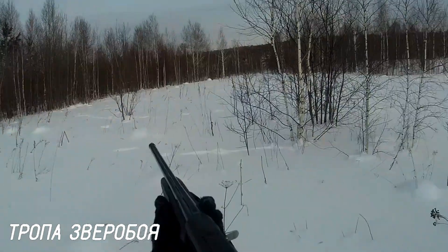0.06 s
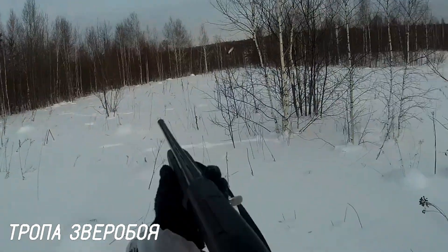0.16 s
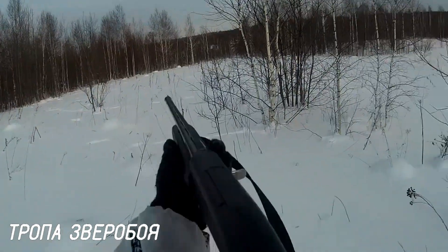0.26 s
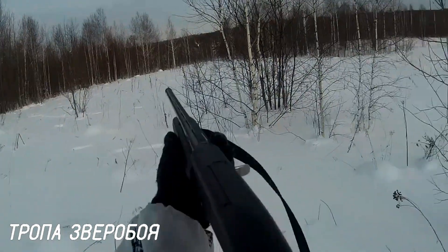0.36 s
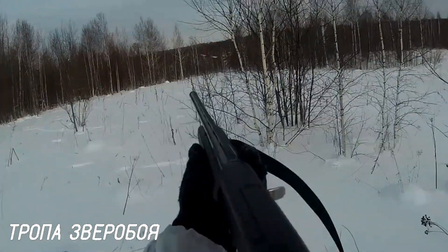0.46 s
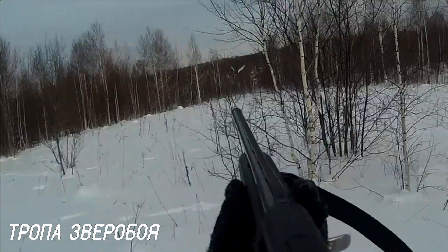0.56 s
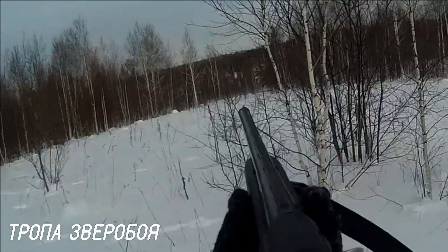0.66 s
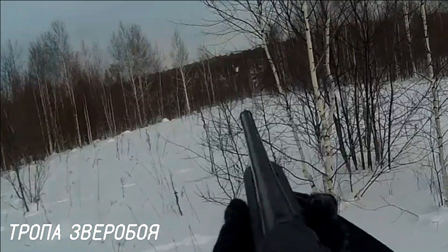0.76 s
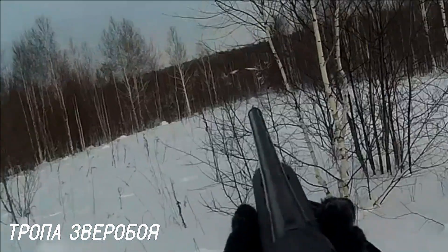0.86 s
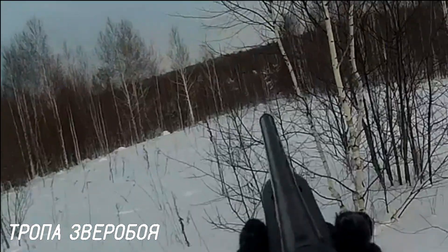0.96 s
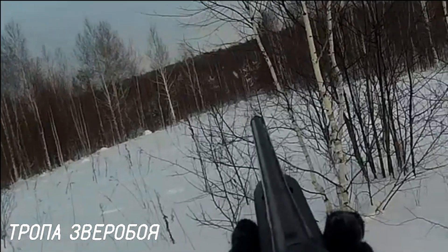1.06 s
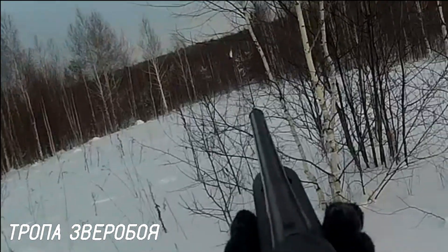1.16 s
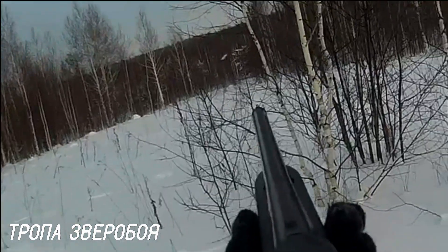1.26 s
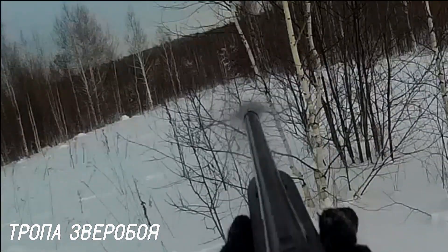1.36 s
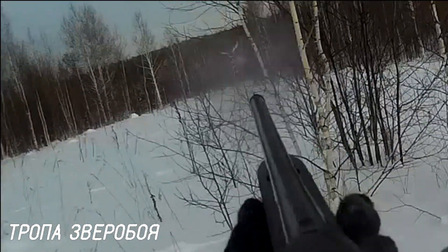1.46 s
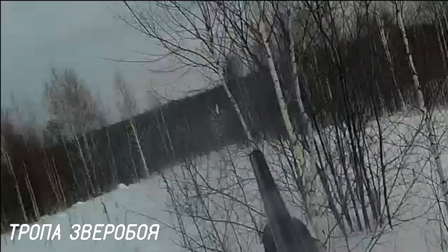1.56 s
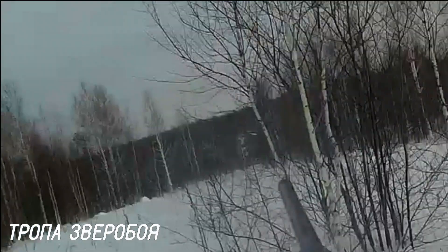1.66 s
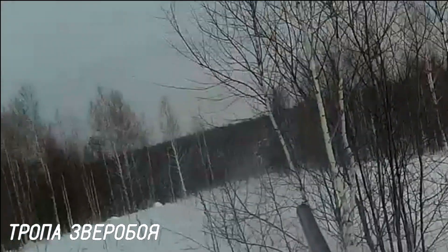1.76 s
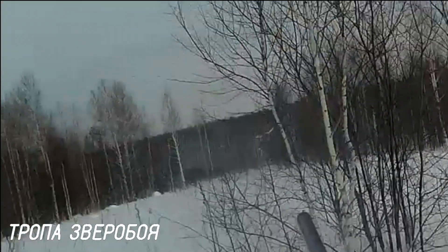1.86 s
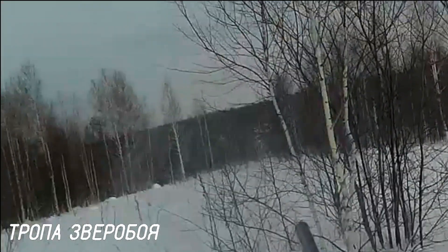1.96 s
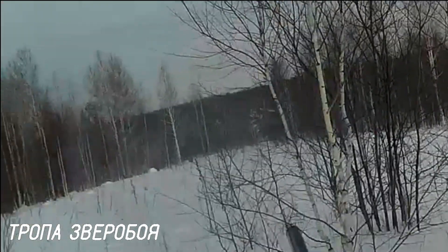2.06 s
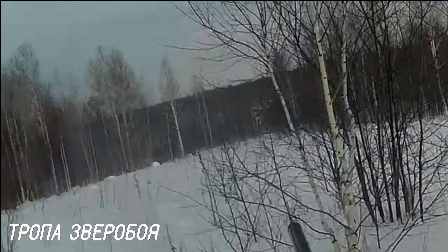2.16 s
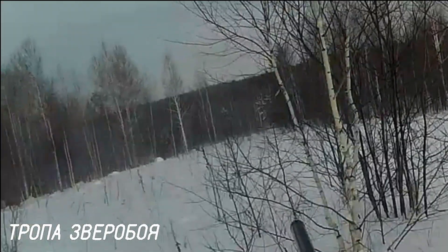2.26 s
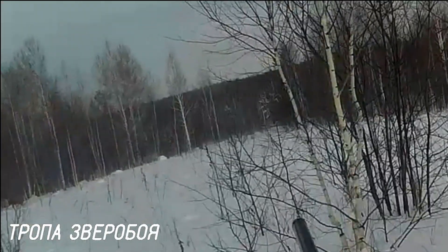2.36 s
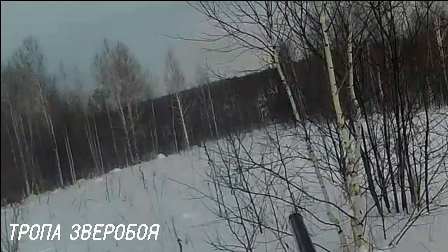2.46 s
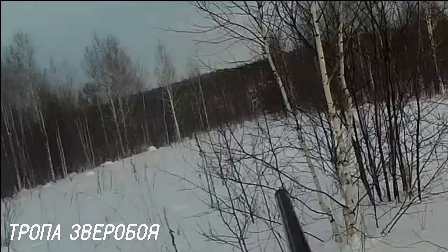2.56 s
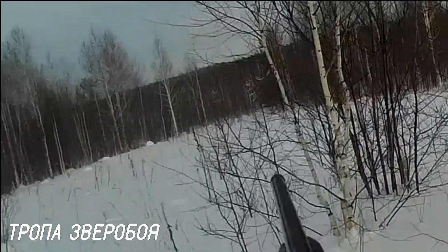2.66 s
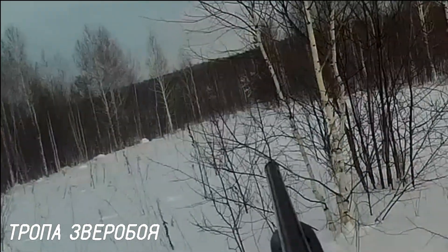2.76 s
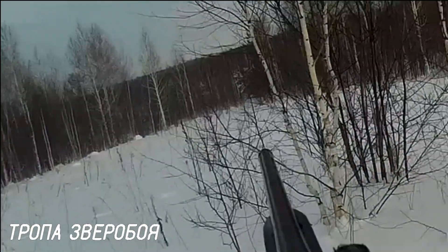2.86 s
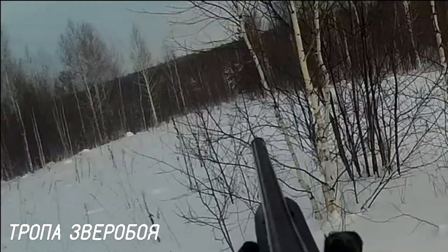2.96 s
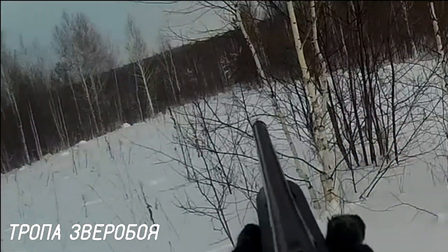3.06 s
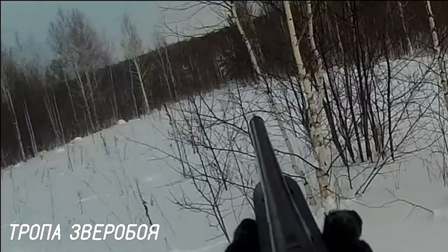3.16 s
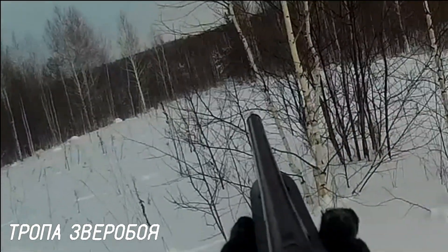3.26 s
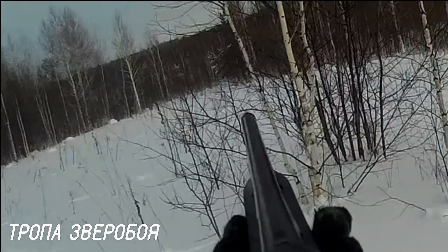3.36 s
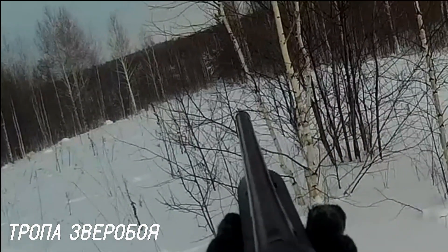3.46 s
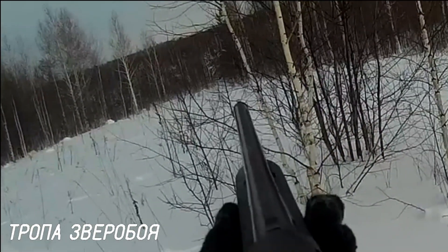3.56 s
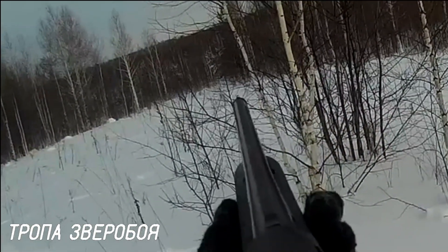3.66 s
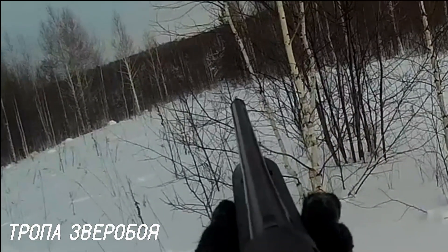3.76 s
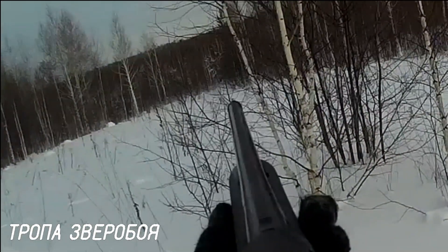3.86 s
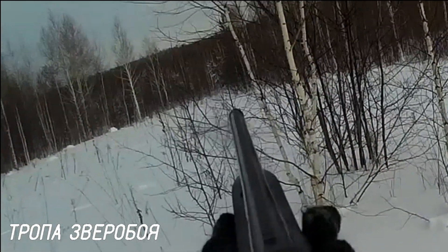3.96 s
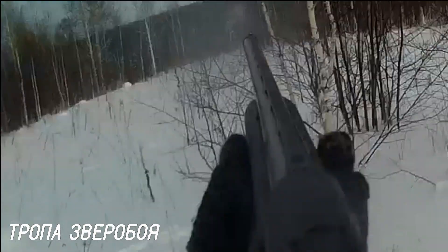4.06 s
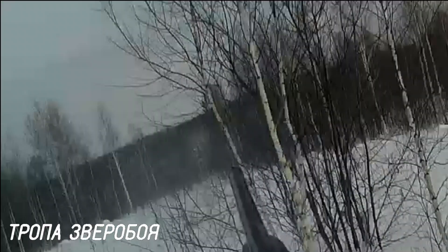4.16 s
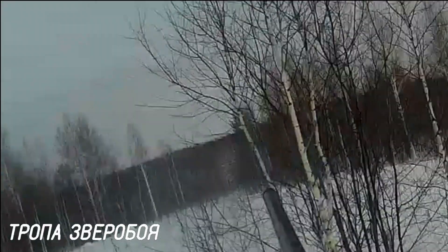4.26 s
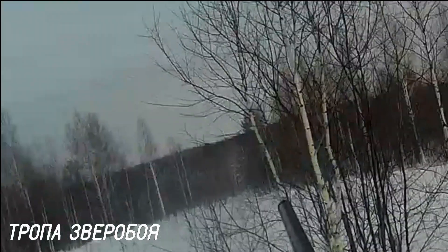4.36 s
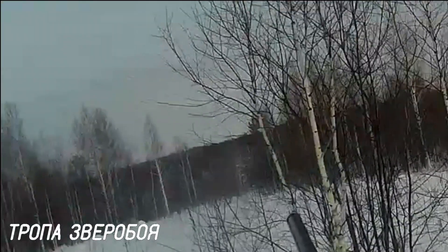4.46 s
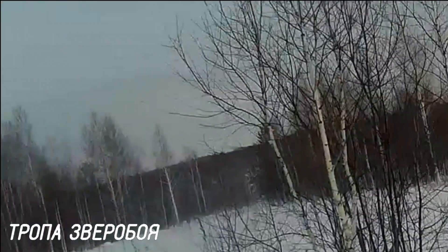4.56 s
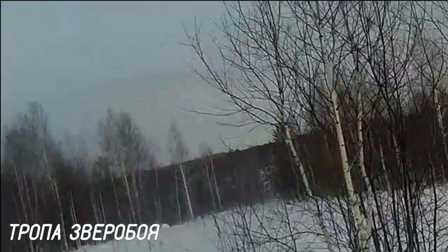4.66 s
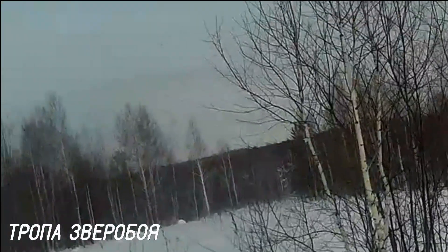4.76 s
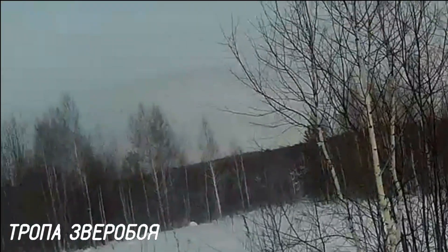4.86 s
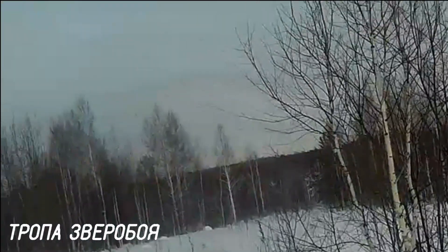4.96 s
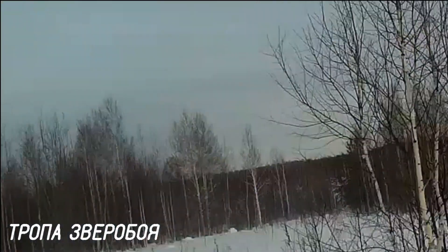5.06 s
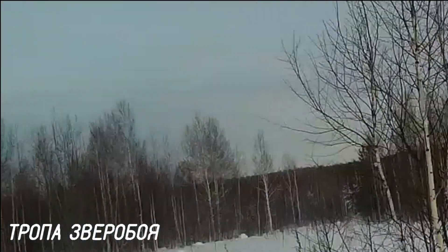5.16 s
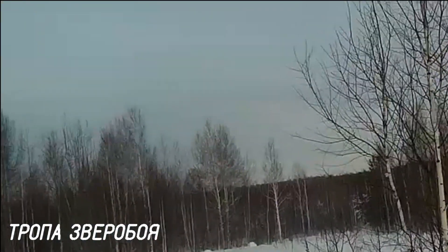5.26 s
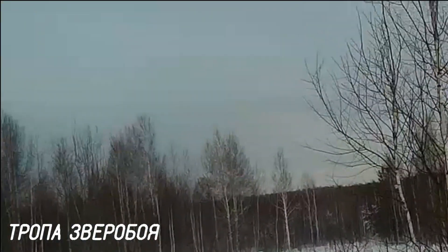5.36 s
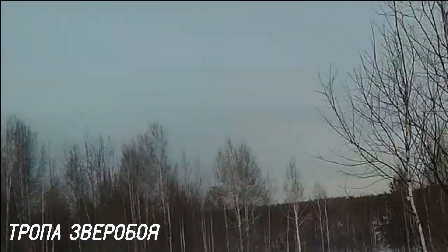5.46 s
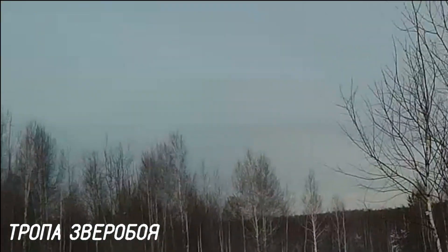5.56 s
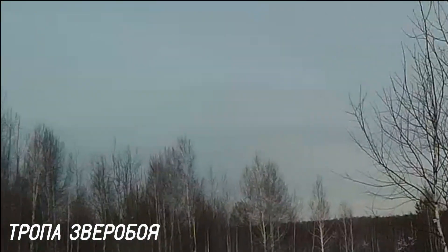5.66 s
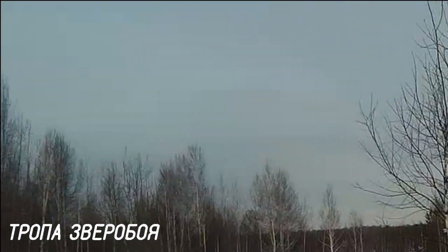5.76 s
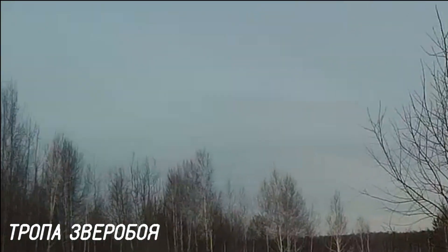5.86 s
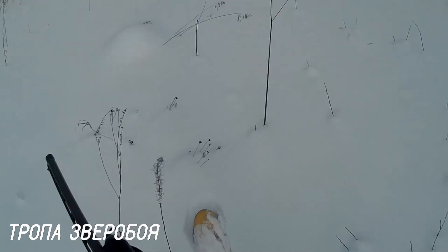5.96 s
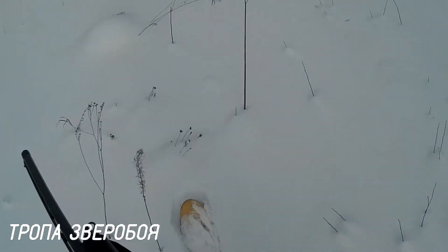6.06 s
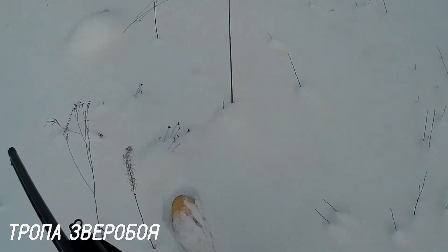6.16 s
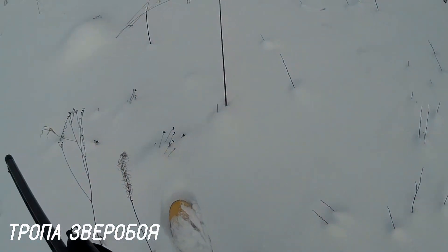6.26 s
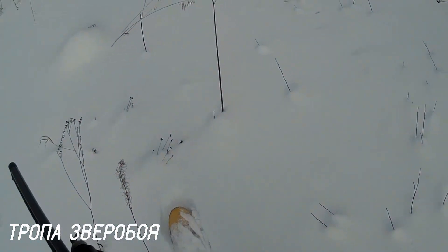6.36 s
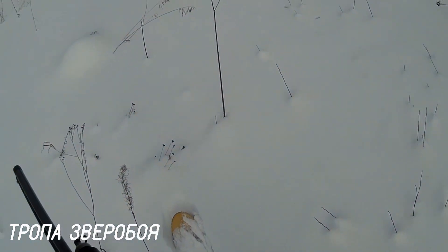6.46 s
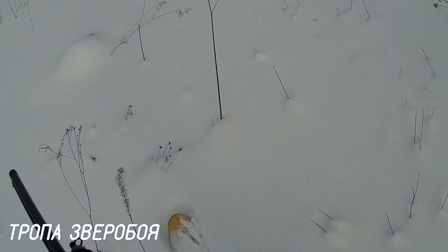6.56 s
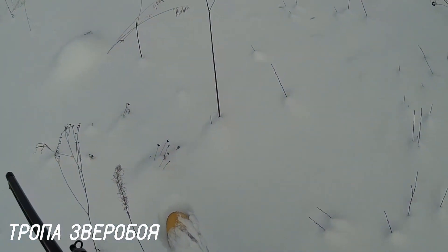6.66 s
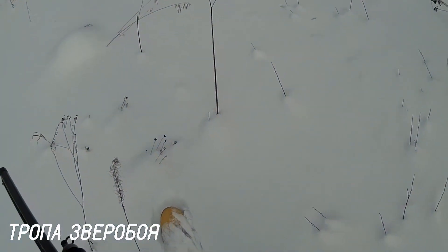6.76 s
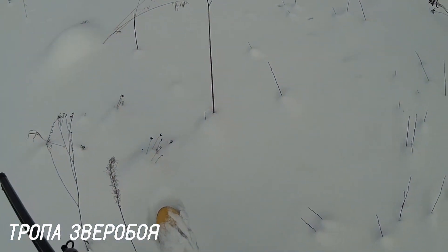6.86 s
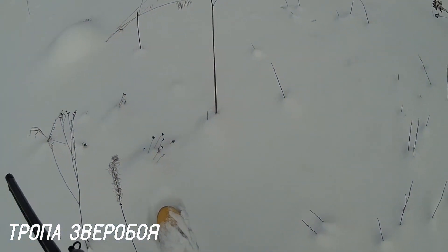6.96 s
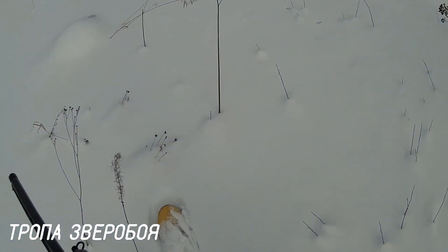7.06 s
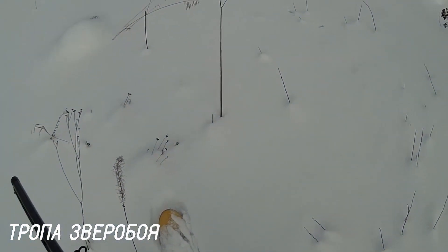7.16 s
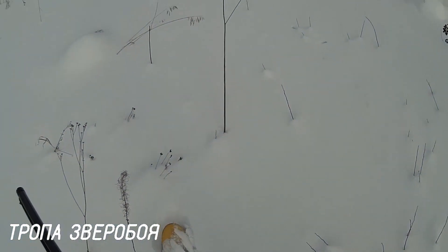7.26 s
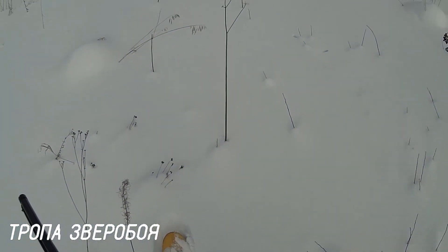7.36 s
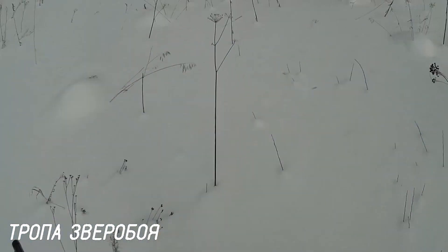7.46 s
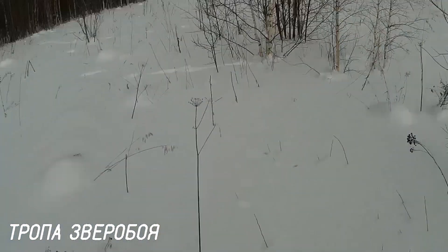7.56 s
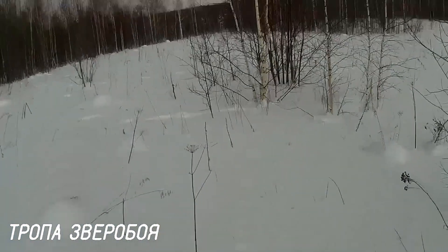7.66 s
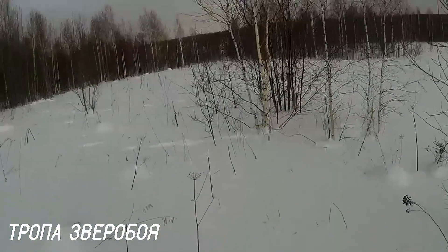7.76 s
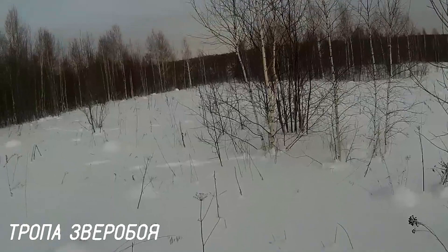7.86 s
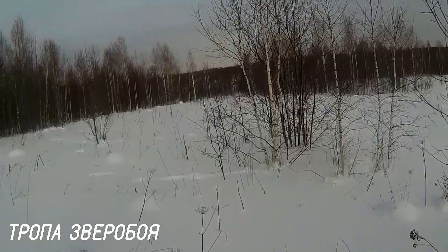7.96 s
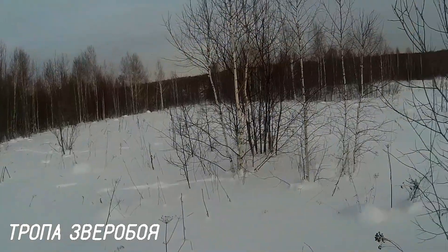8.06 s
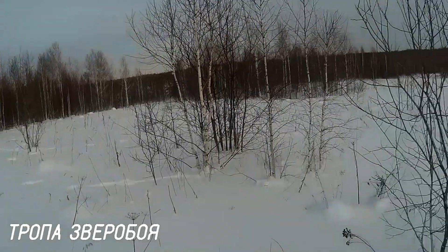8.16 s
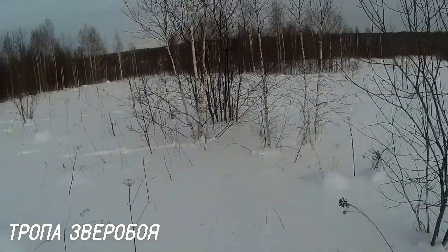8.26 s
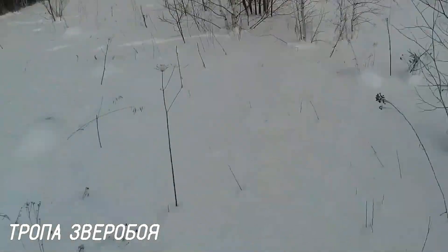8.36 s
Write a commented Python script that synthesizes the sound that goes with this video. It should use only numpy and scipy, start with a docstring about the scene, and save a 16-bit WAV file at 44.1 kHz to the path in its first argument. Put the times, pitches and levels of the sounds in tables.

```python
"""Two shotgun blasts in a snowy forest

Two blasts of a self-loading shotgun overload a camera worn by the shooter. Each is a noisy crack, boom and pressure swing.
After each, the bolt flies back, throws the shell and slams shut: bursts of noise plus ringing steel tones.
The forest gives both shots the same rolling echo, made of many random arrivals. It swells up to the
forest edge and darkens with distance until a cut ends it; the segment after the cut has more treble.
The gun and sling click before, between and after the shots, clothes rustle, and a faint hiss runs throughout."""
import sys
import numpy as np
from scipy.fft import rfft, irfft, next_fast_len
from scipy.io import wavfile
from scipy.ndimage import map_coordinates

SR = 44100
rng = np.random.default_rng(int(sys.argv[2]) if len(sys.argv) > 2 else 0)


def digitize_waveform(pressure):
    """Quantize a signal to 16-bit integers and store it at the path in sys.argv[1].

    Rows of a 2-D input are taken as channels; values are limited to [-1, 1].
    """
    field = np.atleast_2d(pressure).T
    bounded = np.clip(field, -1, 1)
    quanta = np.round(bounded * 32767).astype(np.int16)
    wavfile.write(sys.argv[1], SR, quanta)


N = 370881
TIME = np.arange(N) / SR
BRIEF = TIME[:SR // 3]  # the time within one short sound
CUT_S = 5.981  # a cut ends the echo; the segment after it is brighter
NARROW_HZ, TOP_HZ = 6184, 16000  # upper band limit of the first segment, and of the whole
NEAREST_TREES_S, FOREST_EDGE_S = 0.2, 0.91  # echo delays
TREE_LINE_S = 0.02  # the first trees come in over this much delay
SHADE_S = 0.15  # past the edge, the front trees screen the rest on this time scale

# Spectra give the colour of a noise; their levels are relative.
# effort of the shooter's arms, in two stretches: t/s, effort/dB
ARM_EFFORT = [
    [(0.0, -55.5), (0.118, -55.5), (0.288, -63), (0.52, -60.5), (0.676, -65), (0.814, -60.5),
     (0.988, -70.5), (1.3, -83)],
    [(6.02, -60.5), (6.14, -68), (6.39, -68), (6.49, -61), (6.99, -69.5), (7.51, -60), (8.01, -67.5),
     (8.41, -63)],
]
# sleeves brushing: f/Hz, level/dB
BRUSH_SPECTRUM = [(12, -33.5), (20, 4.5), (92, -5.5), (188, -2), (351, -9), (434, -7), (471, -10),
                  (1000, -19.5), (1300, -50), (2200, -120)]
# sleeves swishing: f/Hz, level/dB
SWISH_SPECTRUM = [(400, -3.5), (800, 1), (1800, 2.5), (3000, -12), (6000, -18)]
# gloves, sleeves and sling scuff the gun: t/s, level/dB, centre f/Hz, length/s
FABRIC_SCUFFS = [(0, -59, 1000, 0.099), (0, -65, 2220, 0.1), (0.141, -61, 790, 0.076),
                 (0.257, -55, 630, 0.042), (0.56, -53, 420, 0.069), (.68, -60, 220, 0.071),
                 (0.565, -66.5, 2300, 0.065), (6.452, -58.5, 1800, 0.034), (6.493, -71, 1600, 0.043),
                 (7.514, -57, 1880, 0.034), (7.746, -58, 643, 0.039), (7.75, -61, 2990, 0.03),
                 (7.869, -61, 1800, 0.061), (7.94, -55, 2400, 0.023), (8.064, -57.5, 1690, 0.026),
                 (8.197, -56, 196, 0.23)]
# steady hiss: f/Hz, level/dB
HISS_SPECTRUM = [(12, -28), (20, 5.5), (182, -5), (337, -16.5), (1480, -18), (1860, -19), (3340, -22),
                 (13500, -25), (16000, -34.5)]
# handling clicks: t/s, relative level/dB, ring f/Hz, tick re ring/dB, stock knock re ring/dB,
# firmness (share of clean ring, 0-1)
HANDLING_CLICKS = [(0.341, -37, 2280, -19, -12, 0.07), (.494, -35.5, 1800, -21, -4, 0.16),
                   (0.562, -40.5, 1900, -22, -8, 0.1), (0.781, -30, 2080, -12, -6, 0.26),
                   (.803, -37, 1110, -24, -23, 0.55), (.998, -39.5, 2310, -14, -6, 0.2),
                   (1.368, -33, 2580, -20, -11, 0.3), (2.6144, -12.5, 1760, -30, -1, 0.34),
                   (2.985, -15, 2160, -32, -3.5, 0.23), (6.0605, -36, 1760, -5, -23, 0.2),
                   (6.127, -37, 1780, -23, -10, 0.4), (6.474, -37, 1600, 1, -22, 0.03),
                   (6.4946, -5.5, 1300, -4.5, -47, 0.63), (6.637, -41.5, 1678, -14, -20, 0.3),
                   (6.709, -50.5, 1260, -14, -14, 0.05), (6.969, -42, 1307, -16, -20.5, 0.3),
                   (7.3995, -40, 1050, 12.5, -20.5, 0.6), (7.472, -47, 890, -17, 0, 0.56),
                   (7.526, -49, 996, -4, 8, 0.44), (7.749, -36, 2340, 0.5, -12, 0.32),
                   (7.788, -42, 1600, -3, -18.5, 0), (7.811, -38, 2990, 1, -16, 0.2),
                   (7.882, -42, 1730, -2, -24, 0), (7.9273, -26, 2290, -5, -29, 0.38),
                   (7.9358, -11, 1290, -3, -12.5, 0.57), (8.069, -41.5, 900, -17, 3.5, 0),
                   (8.0817, -39, 700, 0, -7, 0.37)]
# catch and swivel: f/Hz, average level/dB, t60/s
FITTING_TONES = [(674, -14, 0.051), (2230, -3.5, 0.0054), (3240, -0.5, 0.0088), (4070, 1.5, 0.0081),
                 (6900, -9.5, 0.008), (9046, -14, 0.01)]
# grit in a click: f/Hz, level/dB
TICK_SPECTRUM = [(250, -11), (650, 7), (1300, 12), (2200, 2), (4200, -2.5), (5300, -3), (7500, -5),
                 (9200, -20), (11000, -35), (15000, -42)]
# thud of the stock: f/Hz, level/dB
THUD_SPECTRUM = [(30, -26.5), (80, -18.5), (160, 6.5), (450, 4), (800, 0.5), (1500, -18), (4000, -39)]
# shots: t/s, crack level/dB, crack length/s, relative boom level/dB, relative pressure swing/dB,
# rise/s, echo level/dB
GUNSHOTS = [(1.39, 3, 0.026, 15.5, 1.5, 0.0083, -1.5), (3.975, 13.5, 0.022, 14.5, 5.5, 0.0045, 0)]
# muzzle crack: f/Hz, level/dB
CRACK_SPECTRUM = [(60, -1), (300, 3), (800, 3.5), (2000, -7.5), (5000, -22.5), (8000, -31.5)]
# muzzle boom: f/Hz, level/dB
BOOM_SPECTRUM = [(20, -10), (50, -4), (85, -22), (150, 0.5), (300, -4), (600, -22.5), (2000, -47)]
# echo from snow and bushes near the shooter: f/Hz, level/dB
NEARBY_SPECTRUM = [(35, -2), (110, 1), (200, -3.5), (500, -10), (1300, -11.5), (3200, -15), (6000, -34)]
# low roll from the trunks: f/Hz, level/dB
ROLL_SPECTRUM = [(35, -72), (60, -36), (108, -22.5), (184, -5), (252, -0.5), (359, 1.5), (511, -7.5),
                 (603, 1), (678, -7), (800, -26), (1000, -24), (1300, -57.5), (2200, -120)]
# fine scatter from the twigs: f/Hz, level/dB
SCATTER_SPECTRUM = [(400, -14.5), (750, 11), (1000, 4.5), (1250, 3.5), (1600, 3.5), (2200, -4.5),
                    (3200, -13), (4500, -21.5), (6000, -32), (7500, -53.5)]
# the bolt unlocks, hits its rear stop, rattles, flicks out the shell, picks up the next,
# slams shut and locks: t/s, level/dB, thud re level/dB, t60/s
BOLT_IMPACTS = [(1.43, -18, 1.5, 0.24), (1.4462, -7.5, -3, 0.045), (1.4746, -21.5, 14.5, 0.04),
                (1.4799, -16.5, 14, .022), (1.5027, -24, 9, 0.021), (1.507, -25, 3.5, 0.056),
                (1.551, -27, -4, 0.039), (1.6694, -16, -8, 0.012), (1.6797, -9.5, -3.5, 0.056),
                (1.6923, -12, -1.5, 0.059), (4.016, -21, 1, 0.097), (4.032, -12, -0.5, 0.08),
                (4.0593, -16, 6.5, 0.023), (4.0642, -22.5, 9.5, 0.051), (4.087, -25.5, 6, 0.052),
                (4.092, -27.5, 11, 0.054), (4.0997, -9.5, -4.5, 0.006), (4.268, -20.5, 11.5, 0.0096),
                (4.278, -10, -5, 0.024), (4.2819, -4.5, -18, 0.02), (4.292, -13, -0.5, 0.077)]
# ring of the receiver: f/Hz, average level/dB, longest t60/s
RECEIVER_TONES = [(850, -13.5, .3), (1180, -5.5, 0.45), (1420, -6.5, .16), (1615, -11.5, .25),
                  (1950, -8, .14), (2340, -14, .25), (2520, -13, 0.17), (3000, -11.5, .085),
                  (3340, -12, 0.097), (3540, -14.5, .12), (4840, -26.5, .09), (5700, -29.5, 0.087)]
# steel clashing on steel: f/Hz, level/dB
CLASH_SPECTRUM = [(180, -35), (300, 0), (604, 4), (1010, -8.5), (1320, -3.5), (1680, -3.5), (3300, -12.5),
                  (3930, -22), (4870, -26), (5890, -40), (7500, -62.5), (9750, -100.5), (16500, -120)]
# the recoil spring zings as the bolt reaches its rear stop: t/s, level/dB, centre f/Hz
SPRING_ZINGS = [(1.446, -24.5, 3538), (4.033, -26.5, 3477)]
# echoes from dense stands of trees: delay/s, relative low thump/dB, bright bark reflection/dB
TREE_STANDS = [(0.198, -38, -29.5), (.245, -31.5, -22), (0.288, -28.5, -25.5), (0.361, -22.5, -20.5),
               (0.409, -22, -25), (0.438, -22.5, -23), (.471, -23.5, -38.5), (0.537, -13, -22.5),
               (.596, -17, -22.5), (.643, -14, -24), (0.674, -19.5, -29.5), (.744, -13.5, -22.5),
               (.794, -10.5, -20.5), (.838, -14.5, -32), (.866, -12.5, -29.5), (0.912, -16.5, -28.5),
               (0.939, -21.5, -24), (1.052, -26.5, -32), (1.093, -26.5, -36), (1.138, -23.5, -37),
               (1.183, -21.5, -29), (1.223, -34.5, -32), (1.274, -29.5, -35), (1.348, -42, -30),
               (1.469, -24, -39), (1.495, -26.5, -39), (1.568, -28, -37.5), (1.615, -28, -34),
               (1.715, -25.5, -43), (1.771, -23, -41.5), (1.796, -28, -43), (1.841, -22, -50),
               (1.945, -31.5, -49.5), (2.099, -30, -60), (2.146, -28, -52), (2.195, -30, -42.5)]
# a stand's low thump: f/Hz, level/dB
THUMP_SPECTRUM = [(60, -35), (110, -27.5), (160, -3), (210, 9), (330, 5), (420, -0.5), (510, -13.5),
                  (800, -24.5), (1600, -31), (4000, -70.5)]
# a stand's bright bark reflection: f/Hz, level/dB
BARK_SPECTRUM = [(250, -28.5), (400, 7), (510, -0.5), (610, 5.5), (680, -9.5), (780, -1), (1000, -12.5),
                 (1700, -14), (3000, -26.5), (6000, -49)]
# the bolt rings on after slamming shut: t/s, level/dB
BOLT_SLAMS = [(1.693, -41.5), (4.283, -37)]
# tones of the closed bolt: f/Hz, level/dB
CHIME_TONES = [(4210, -7), (4950, -1), (5810, -10.5)]


def amp(db):
    """Turn decibels into a gain."""
    return 10 ** (np.asarray(db) / 20)


def unit(x):
    """Scale to an average strength (rms) of 1."""
    return x / np.sqrt(np.mean(x ** 2) + 1e-20)


def fade(t60):
    """A decay that loses 60 dB in t60 seconds."""
    return amp(-60 * BRIEF / t60)


def filtered(x, response):
    """Multiply each frequency of x by response(frequency)."""
    size = next_fast_len(len(x) + SR // 2)
    hz = np.fft.rfftfreq(size, 1 / SR)
    return irfft(rfft(x, size) * response(hz), size)[:len(x)]


def coloured(x, spectrum):
    """Shape x by (Hz, dB) points, at rms 1."""
    f, db = np.transpose(spectrum)
    return unit(filtered(x, lambda hz: amp(np.interp(np.log(hz + 1), np.log(f), db))))


def noise(spectrum, size=len(BRIEF)):
    """Coloured noise of rms 1."""
    return coloured(rng.standard_normal(size), spectrum)


def resonant(pitch_hz, width):
    """Noise of rms 1 around one resonance of the given relative width."""
    white = rng.standard_normal(len(BRIEF))
    return unit(filtered(white, lambda hz: 1 / (1 + ((hz - pitch_hz) / (width * pitch_hz)) ** 2)))


def add(track, s, sound):
    """Mix a sound in at time s."""
    start = round(s * SR)
    track[start:start + len(sound)] += sound[:N - start]


def effort():
    """How hard the arms move, as one gain per sample."""
    s, db = np.transpose(np.vstack(ARM_EFFORT))
    return amp(np.interp(TIME, s, db))


def clothes(brush_db=0, swish_db=-64, swish_grows=3.4, grain_db=3.5):
    """Moving sleeves brush, and swish when the effort is high; fabric adds short, grainy scuffs."""
    moving = effort()
    swish = (moving / moving.max()) ** swish_grows
    out = amp(brush_db) * moving * noise(BRUSH_SPECTRUM, N)
    out += amp(swish_db) * swish * noise(SWISH_SPECTRUM, N)
    for s, db, centre_hz, length in FABRIC_SCUFFS:
        stroke = np.sin(np.pi * np.minimum(BRIEF / length, 1))
        wobble = map_coordinates(rng.standard_normal(200), [BRIEF * 250])
        grain = unit(amp(grain_db * wobble))  # fabric catches and slips
        add(out, s, amp(db) * stroke * grain * resonant(centre_hz, width=0.39))
    return out


def hiss(level_db=-66.0):
    """A faint, steady coloured noise."""
    return amp(level_db) * noise(HISS_SPECTRUM, N)


def handling(click_db=-5, tone_db=4, fittings_db=-7, grit_db=-9, after_db=-35, after_t60=0.11,
             ring_cycles=45, overtone=1.5, overtone_db=-13, contact=0.0002):
    """Light touches click drily, firm ones ring the part; the stock knocks, the fittings tick."""
    out = np.zeros(N)
    for s, db, pitch_hz, tick_db, knock_db, firm in HANDLING_CLICKS:
        # low parts ring longer, a firm press damps them
        t60 = ring_cycles * max(1 - firm, .1) / pitch_hz
        phase = 2 * np.pi * pitch_hz * BRIEF
        tone = amp(tone_db) * (np.sin(phase) + amp(overtone_db) * np.sin(overtone * phase))
        body = firm * tone + (1 - firm) * resonant(pitch_hz, width=0.33)
        body += amp(knock_db) * noise(THUD_SPECTRUM)
        ring = body * fade(t60) * (1 - np.exp(-BRIEF / 0.00091))
        steel = np.zeros(len(BRIEF))
        for hz, level, life in FITTING_TONES:
            strength = amp(level + rng.normal(0, 0.99))  # each contact differs a little
            steel += strength * fade(life) * np.sin(2 * np.pi * hz * BRIEF)
        tick = amp(fittings_db) * steel * (1 - np.exp(-BRIEF / contact))
        tick += amp(grit_db) * noise(TICK_SPECTRUM) * fade(t60)
        rattle = amp(after_db) * noise(TICK_SPECTRUM) * fade(after_t60)
        add(out, s, amp(db + click_db) * (ring + amp(tick_db) * tick + rattle))
    return out


def blasts(boom_life=.025, push_life=.04, shudder_hz=178, shudder_db=-2):
    """A bright crack breaks off, a slower boom shakes the camera housing, and pressure swings once."""
    out = np.zeros(N)
    for s, crack_db, crack_life, boom_db, push_db, rise, _ in GUNSHOTS:
        crack = amp(crack_db) * noise(CRACK_SPECTRUM) * np.exp(-(BRIEF / crack_life) ** 3)
        # the gas ball swells and collapses
        gas = np.exp(-(BRIEF / boom_life) ** 3) * np.minimum(BRIEF / 0.058, 1)
        shudder = amp(shudder_db) * np.sqrt(2) * np.sin(2 * np.pi * shudder_hz * BRIEF)
        boom = amp(boom_db) * (1.6 * noise(BOOM_SPECTRUM) + shudder) * gas
        turn = np.pi * np.minimum(BRIEF / push_life, 1)
        push = -amp(push_db) * np.sin(2 * turn) * np.sin(turn)
        onset = 1 - np.exp(-(BRIEF / rise) ** 3)
        add(out, s, (crack + boom + push) * onset)
    return out


def echoes(cut_s=0.0034):
    """The same ground and trees answer each shot, until the cut."""
    out = np.zeros(N)
    answer = nearby() + forest() + stands()
    for s, *_, echo_db in GUNSHOTS:
        add(out, s, amp(echo_db) * answer)
    return out * np.clip((CUT_S - TIME) / cut_s, 0, 1)


def nearby(level_db=-29, t60=0.68):
    """Snow and the nearest bushes return a soft rumble and thin hiss that steadily sink away."""
    decay = amp(level_db - 60 * TIME / t60)
    return decay * (1 - np.exp(-TIME / 0.023)) * noise(NEARBY_SPECTRUM, N)


def reach(swell_db_per_s, shade_db, fade_db_per_s, open_snow_db=-16):
    """Echo gain by delay: little from open snow, a swell to the forest edge, a drop and a slow fade."""
    before = np.maximum(FOREST_EDGE_S - TIME, 0)
    behind = np.maximum(TIME - FOREST_EDGE_S, 0)
    shade = shade_db * (1 - np.exp(-behind / SHADE_S))
    loss_db = swell_db_per_s * before + shade + fade_db_per_s * behind
    in_the_open = np.clip((NEAREST_TREES_S - TIME) / TREE_LINE_S, 0, 1)
    return amp(open_snow_db * in_the_open - loss_db)


def trunks(per_second, spread_db):
    """Echoes from single trees: random arrivals of uneven strength."""
    arrives = rng.random(N) < per_second / SR
    sign = rng.choice([-1, 1], N)
    strength = amp(spread_db * np.clip(rng.standard_normal(N), -2, 2))
    return unit(arrives * sign * strength)


def dulled(near, far_hz, after_s):
    """Later echoes crossed more air and snow: fade towards a low-passed sound of rms 1."""
    far = unit(filtered(near, lambda hz: 1 / (1 + (hz / far_hz) ** 2)))
    distance = np.clip(TIME / after_s, 0, 1)
    return (1 - distance) * near + distance * far


def forest(roll_db=-22.0, scatter_db=-28.5, lumpy_db=1.5):
    """Trunks return a lumpy low roll, twigs a fine scatter; both darken with distance."""
    roll = reach(swell_db_per_s=10.5, shade_db=10.5, fade_db_per_s=3.0)
    scatter = reach(swell_db_per_s=10.5, shade_db=10.5, fade_db_per_s=8.5)
    lumps = map_coordinates(rng.standard_normal(1000), [TIME * 70])  # tree density changes with range
    low = coloured(trunks(per_second=750, spread_db=0.5), ROLL_SPECTRUM)
    low = unit(low * amp(lumpy_db * np.tanh(lumps)))
    high = coloured(trunks(per_second=4000, spread_db=0.5), SCATTER_SPECTRUM)
    high = unit(high * amp(0.53 * lumps))
    return (amp(roll_db) * roll * dulled(low, far_hz=337, after_s=3.3)
            + amp(scatter_db) * scatter * dulled(high, far_hz=6064, after_s=0.73))


def action(ring_db=-11, ring_t60=0.22, impact_db=4, impact_t60=0.0088, attack=0.001):
    """Steel strikes steel: a hard impact, a rattling clash, the receiver's ring and a stock thud."""
    out = np.zeros(N)
    for s, db, thud_db, t60 in BOLT_IMPACTS:
        ring = np.zeros(len(BRIEF))
        for hz, level, life in RECEIVER_TONES:
            strength = amp(level + rng.normal(0, 2))  # each strike excites the tones differently
            tone = np.sin(2 * np.pi * (hz * BRIEF + rng.random()))
            ring += strength * fade(min(life, ring_t60, 3 * t60)) * tone
        force = 1.14 * fade(t60) + amp(impact_db) * .5 * fade(impact_t60)
        clash = (noise(CLASH_SPECTRUM) + amp(thud_db) * noise(THUD_SPECTRUM)) * force
        onset = 1 - np.exp(-BRIEF / attack)
        add(out, s, amp(db) * (clash + amp(ring_db) * ring) * onset)
    return out


def spring(length=0.027, width=0.06):
    """The squeezed recoil spring scrapes in its tube: a brief zing."""
    out = np.zeros(N)
    for s, db, pitch_hz in SPRING_ZINGS:
        add(out, s, amp(db) * resonant(pitch_hz, width) * np.clip(1 - BRIEF / length, 0, 1))
    return out


def stands(gain_db=1, bark_db=0, front=0.0034, depth=0.028, lowest_hz=85):
    """Dense stands return a dull thump and brighter slap: abrupt in front, trailing off with depth."""
    out = np.zeros(N)
    shape = (1 - np.exp(-(BRIEF / front) ** 2)) * np.exp(-(BRIEF / depth) ** 2)
    for s, thump_db, bright_db in TREE_STANDS:
        thump = amp(thump_db + gain_db) * unit(shape * noise(THUMP_SPECTRUM))
        slap = amp(bright_db + bark_db) * unit(shape * noise(BARK_SPECTRUM))
        add(out, s, (thump + slap) * np.sqrt(np.mean(shape ** 2)))
    # keep the thumps free of deep bass
    return filtered(out, lambda hz: (1j * hz / (lowest_hz + 1j * hz)) ** 2)


def chime(t60=0.085):
    """The locked bolt keeps a short, high steel ring."""
    out = np.zeros(N)
    for s, db in BOLT_SLAMS:
        ring = sum(amp(level) * np.sin(2 * np.pi * hz * BRIEF) for hz, level in CHIME_TONES)
        add(out, s, amp(db) * ring * fade(t60))
    return out


def scene():
    """Mix clothes, hiss, gun and forest into one channel."""
    around = clothes() + hiss() + echoes()
    gun = handling() + blasts() + action() + spring() + chime()
    return (around + gun)[None]


def record(dry, overload=0.65, ceiling=0.69, coupling_hz=3.3):
    """The microphone clips and recovers slowly; the segment before the cut is dull; all is clipped again."""
    x = np.clip(dry[0], -overload, overload)
    x = filtered(x, lambda hz: 1j * hz / (coupling_hz + 1j * hz))  # slow drift is removed
    narrow = filtered(x, lambda hz: 1 / np.sqrt(1 + (hz / NARROW_HZ) ** 44))
    x = np.where(TIME < CUT_S, narrow, x)
    x = np.clip(x, -ceiling, ceiling)
    return filtered(x, lambda hz: 1 / np.sqrt(1 + (hz / TOP_HZ) ** 70))[None]


dry = scene()
out = record(dry)
digitize_waveform(out)
```